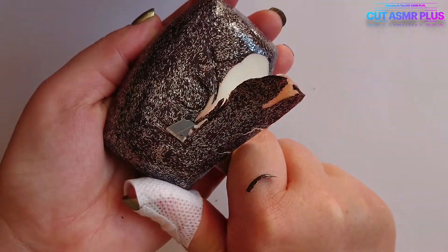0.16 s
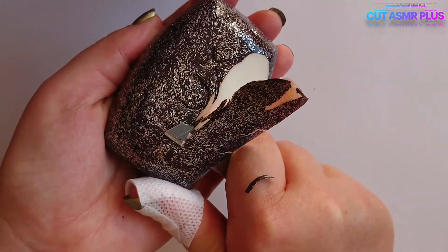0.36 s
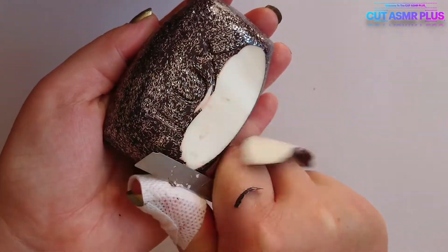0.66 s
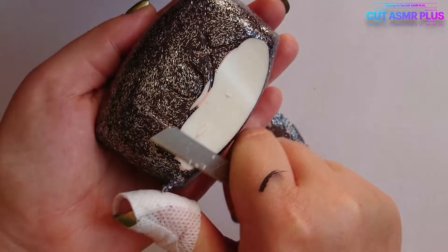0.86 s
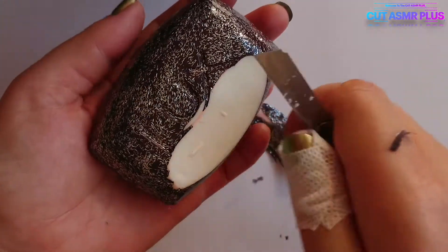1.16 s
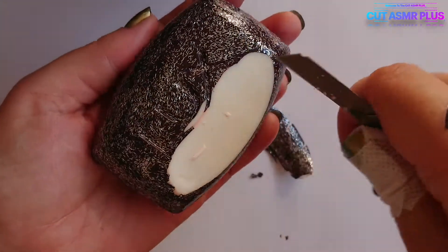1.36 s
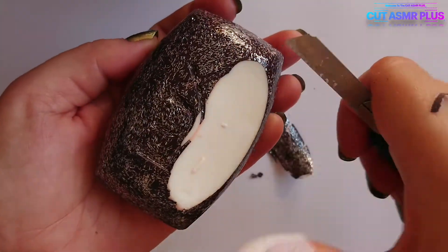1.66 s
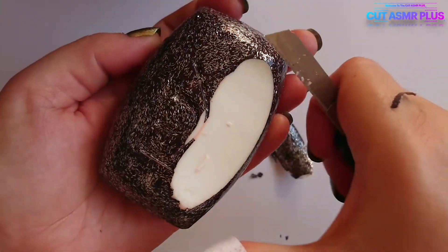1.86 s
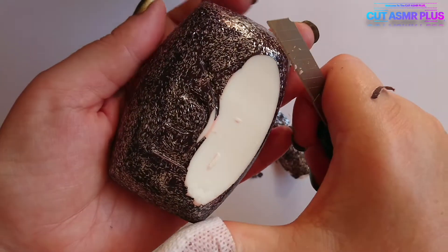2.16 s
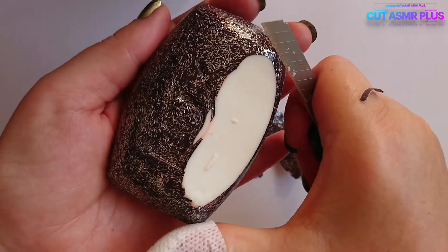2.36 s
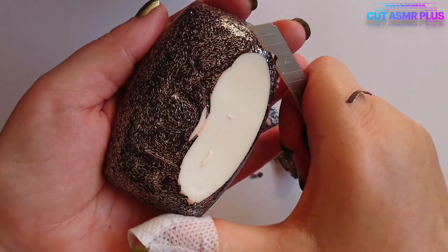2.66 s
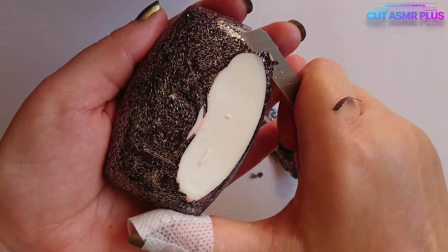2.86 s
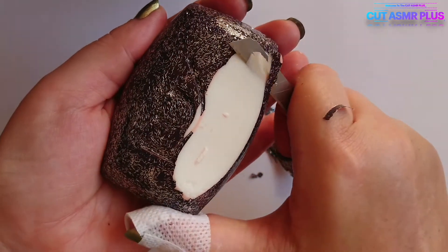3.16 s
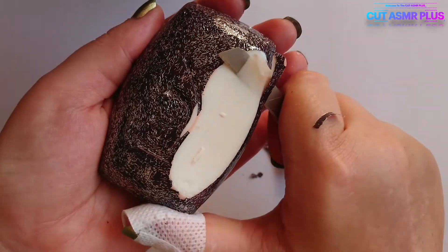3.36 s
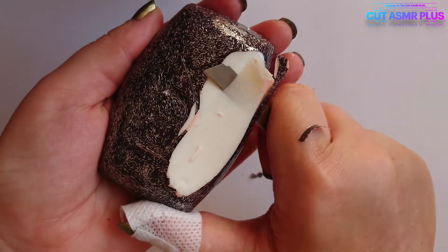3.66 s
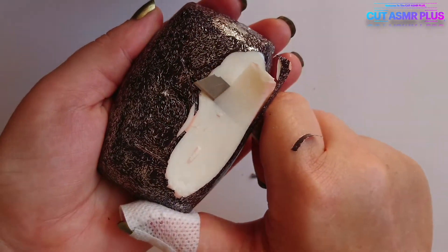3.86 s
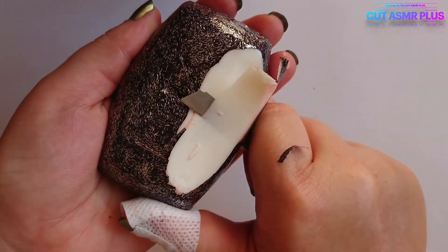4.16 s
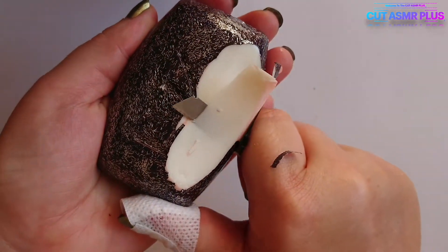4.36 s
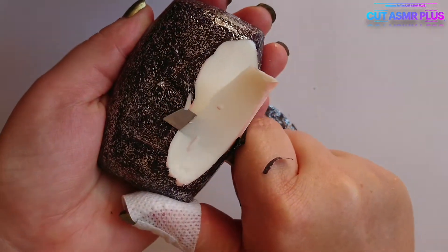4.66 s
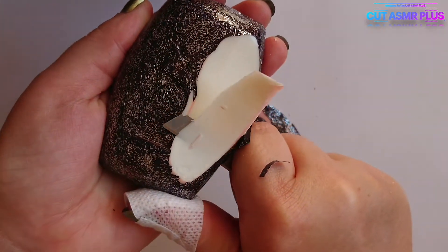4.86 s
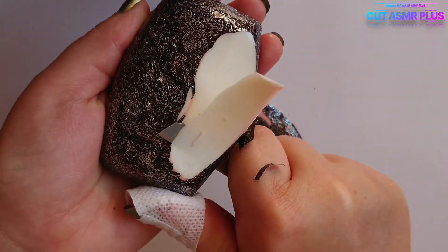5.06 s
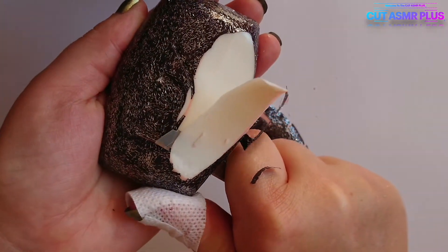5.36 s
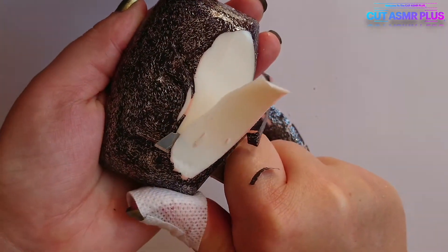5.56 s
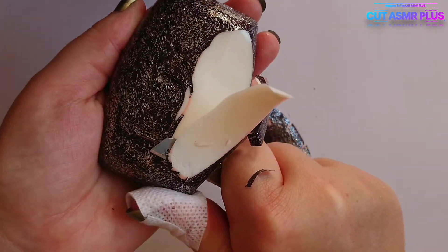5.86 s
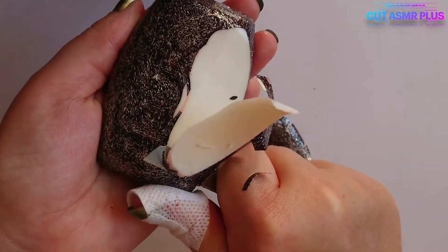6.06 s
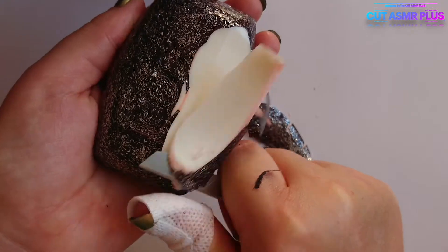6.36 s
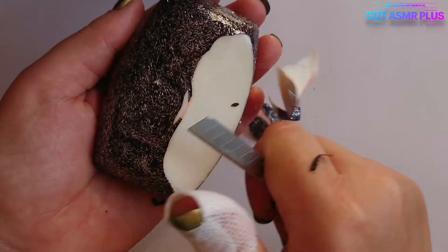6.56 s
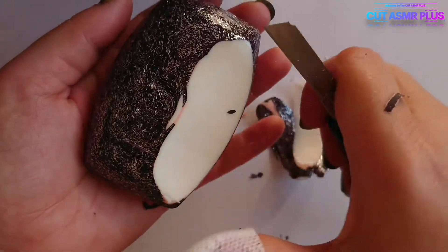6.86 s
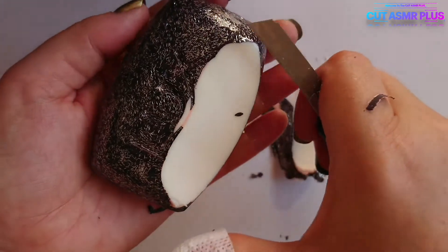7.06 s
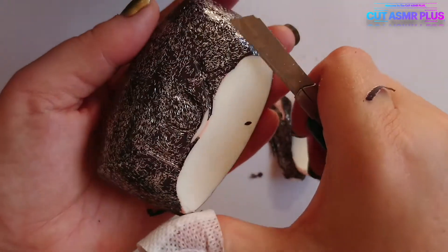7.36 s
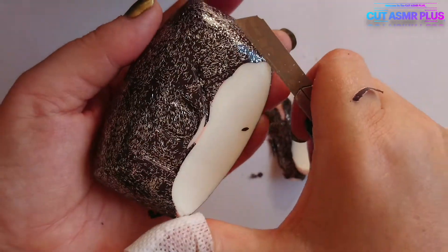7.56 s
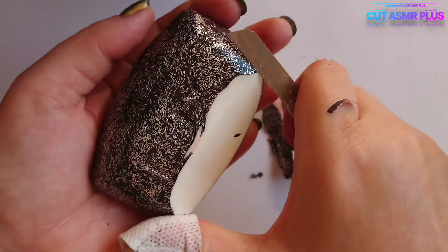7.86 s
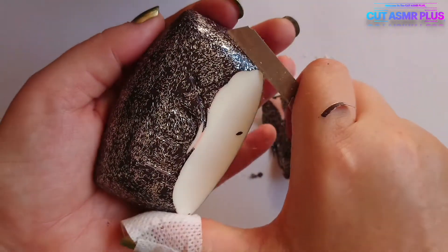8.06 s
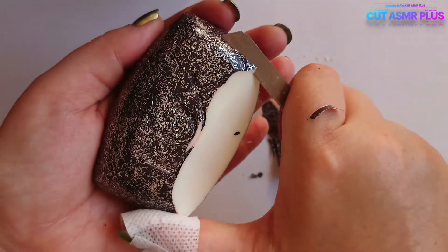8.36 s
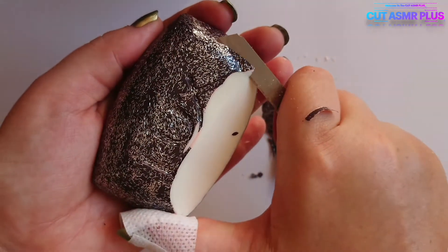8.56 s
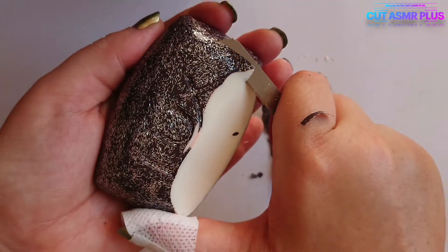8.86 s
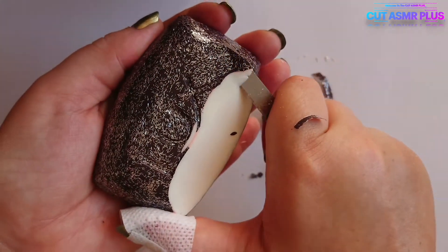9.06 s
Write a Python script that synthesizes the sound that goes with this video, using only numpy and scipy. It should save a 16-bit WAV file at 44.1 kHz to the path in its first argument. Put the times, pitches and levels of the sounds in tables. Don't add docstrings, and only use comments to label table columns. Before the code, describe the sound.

Brittle coating breaks with glassy, high snaps and a short metallic blade ring, followed by shavings clattering and rocking on a wooden tabletop. After a few blade taps, delicate irregular ticks and faint rasping thicken into crackle, thin out, then burst into crunchy cracks and another drop. The end is nearly still, with small clicks over room rumble, hiss and a faint appliance drone. Two close microphones.

```python
import sys
import numpy as np
from scipy import signal
from scipy.io import wavfile
from scipy.ndimage import uniform_filter1d

SR = 44100
rng = np.random.default_rng(int(sys.argv[2]) if len(sys.argv) > 2 else 0)


def invert_db(level):
    return 10 ** (np.asarray(level, dtype=float) / 20)


def pcm_store(signal):
    levels = np.round(np.clip(np.atleast_2d(signal), -1, 1) * 32767)
    wavfile.write(sys.argv[1], SR, levels.astype(np.int16).T)


N = 407043

# (pitch [Hz], width [Hz], level [dB])
BAR = [(1415, 980, -19.5), (2004, 560, 0), (2650, 190, -1.5)]
# (pitch [Hz], width [Hz], level [dB])
BLADE = [(2840, 1170, 4), (4080, 640, 8), (4640, 250, 8.5), (5795, 1800, 4)]
# (pitch [Hz], width [Hz], level [dB])
FLAKE = [(7500, 2400, 3), (8770, 2700, 6), (11720, 7100, 4), (12690, 1800, 7.5), (13860, 1300, 1),
         (15280, 1100, 1.5), (15970, 1200, -4.5)]


def rms_one(x):
    return x / np.sqrt(np.mean(x ** 2) + 1e-20)


def at_hz(points, hz):
    table_hz, values = np.array(points)[:, 0], np.array(points)[:, 1]
    return np.interp(np.log(hz), np.log(table_hz), values)


def sides(pan_db):
    return invert_db(np.array([pan_db / 2, -pan_db / 2]))


def resonate(x, hz, width):
    r = np.exp(-np.pi * width / SR)
    turn = 2 * np.pi * hz / SR
    return signal.lfilter([(1 - r * r) / 2, 0, (r * r - 1) / 2], [1, -2 * r * np.cos(turn), r * r], x)


def body(x, modes, strengths_db=None):
    extra_db = np.zeros(len(modes)) if strengths_db is None else strengths_db
    return sum((-1) ** k * invert_db(db + extra_db[k]) * resonate(x, hz, width)
               for k, (hz, width, db) in enumerate(modes))


def grains(shape, per_s, spread_db):
    sizes = invert_db(spread_db * np.minimum(rng.exponential(1, shape), 4))
    signs = rng.choice([-1, 1], shape)
    return rms_one(sizes * signs * (rng.random(shape) < per_s / SR))


def stroke_gain(s, db, fade_s=0.029):
    t = np.arange(N) / SR
    to_nearest_end = np.minimum(t - s[0] + fade_s, s[-1] + fade_s - t)
    return invert_db(np.interp(t, s, db)) * np.clip(to_nearest_end / fade_s, 0, 1)


def bands(x):
    edges = 20 * 2 ** np.arange(0, 10.1, .5)
    for k, (low, high) in enumerate(zip(edges, edges[1:])):
        band = signal.butter(2, [low, high], "band", fs=SR, output="sos")
        yield np.sqrt(low * high), signal.sosfilt(band, x[k % 2])


def background():
    # (pitch [Hz], level [dB per Hz])
    hiss = [(12, -56), (20, -25.5), (35, -14), (63, -1), (342, -11.5), (551, -14), (599, -10), (1050, -17),
            (1510, -15), (2120, -20), (2440, -12.5), (3830, -25), (4930, -30), (6000, -31), (8000, -24),
            (13000, -18.5), (16500, -20)]
    # (pitch [Hz], likeness [0 to 1])
    likeness = [(30, .1), (130, 0.28), (290, 0.062), (640, 0.026), (16000, .01)]
    # (pitch [Hz], width [Hz], level [dB])
    hums = [(1044, 78, -71.5), (2175, 300, -66), (3870, 400, -73.5)]
    out = 0
    for hz, (mid, side) in bands(rng.standard_normal((2, 2, N))):
        alike = np.clip(at_hz(likeness, hz), 0, 1)
        pair = np.sqrt(1 + alike) * mid + np.sqrt(1 - alike) * side * [[1], [-1]]
        out = out + invert_db(at_hz(hiss, hz)) * pair
    out = invert_db(-57) * rms_one(out)
    white = rng.standard_normal((2, N))
    for hz, width, db in hums:
        out = out + invert_db(db) * rms_one(resonate(resonate(white, hz, width), hz, width))
    return out * sides(-1.2)[:, None]


def room(x, onset_ms=0.88, treble_db=0.0):
    # (pitch [Hz], time to fall 60 dB [s])
    echo_times = [(300, 0.46), (790, 0.41), (2090, 0.44), (5510, 0.44), (14600, 0.28)]
    t = np.arange(SR // 2) / SR
    slices = bands(rng.standard_normal((2, 2, len(t))))
    tail = sum(noise * invert_db(treble_db * np.log2(hz / 2000) - 60 * t / at_hz(echo_times, hz))
               for hz, noise in slices)
    tail = tail * np.clip(t * 1000 / onset_ms - .4, 0, 1)
    tail = tail / np.sqrt(np.sum(tail ** 2, axis=1, keepdims=True))
    return signal.fftconvolve(x, tail, axes=1)[:, :N]


def knocks():
    # (time [s], peak [dB], brightness [dB per octave])
    first_drop = [(0.373, -37, 7), (0.395, -34, 12), (.47, -35, -14), (0.5889, -10, 6), (0.6, -17.5, 5.5),
                  (0.604, -28, 12), (0.611, -19, 4), (0.646, -12, 1), (0.7045, -9.5, -2), (0.7154, -11, 3),
                  (0.7414, -22, 6)]
    # (time [s], peak [dB], brightness [dB per octave])
    second_drop = [(5.951, -34.5, 7.5), (6.101, -57, 17.5), (6.2408, -30.5, 4.5), (6.4725, -5.5, -2),
                   (6.482, -19.5, 0), (6.5235, -16, 5.5), (6.532, -30.5, 11.5), (6.566, -15, -2),
                   (6.817, -28.5, -1.5)]
    # (time [s], peak [dB], brightness [dB per octave])
    taps = [(2.06, -46.5, -7), (2.186, -44, 2.5), (2.487, -40.5, 11), (7.29, -41, -7), (7.375, -34, -11),
            (7.983, -51, 14)]
    # (time [s], level [dB])
    tumble = [
        [(.615, -30), (.68, -35.5), (.75, -30), (.8, -61), (.86, -64)],
        [(6.5, -25.5), (6.58, -30), (6.68, -40), (6.76, -44.5), (6.82, -51), (6.9, -54)],
    ]
    # (pitch [Hz], level [dB], time to fall 60 dB [s])
    table_modes = [(91.1, -14.5, 0.068), (135, -15, 0.15), (213, -10.5, 0.16), (318, -7, 0.1),
                   (414.5, -8.5, 0.081), (454, -1, 0.018), (554, -10, 0.075), (670, -11.5, 0.027),
                   (692, -11, 0.083), (761, -1, 0.035), (900, 0.5, 0.019), (1093, -2, 0.019),
                   (1290, 2, 0.0053), (1492, -5.5, 0.011)]
    rows, out = np.array(first_drop + second_drop + taps), np.zeros((2, N))
    at = np.round(rows[:, 0] * SR).astype(int)
    luck = rng.standard_normal((len(rows), len(table_modes), 2))
    rocking = sum(stroke_gain(*np.transpose(rock)) for rock in tumble)
    for k, (hz, db, t60) in enumerate(table_modes):
        tilt_db = (rows[:, 2] + 2) * np.log2(max(hz, 300) / 300)
        small_knocks = rocking * invert_db(db - 31.0) * grains(N, per_s=200, spread_db=4.5)
        clicks = 1e-18 + small_knocks * np.ones((2, 1))
        luck_db = 1.8 * luck[:, k, 0] + 1.53 * luck[:, k, 1] * [[1], [-1]]
        clicks[:, at] += invert_db(rows[:, 1] - 14.0 + db + tilt_db + luck_db)
        b, a = signal.butter(2, hz / 3.9, "high", fs=SR)
        r, w = invert_db(-60 / (t60 * SR)), 2 * np.pi * hz / SR
        top, bottom = np.convolve(b, [0, np.sin(w)]), np.convolve(a, [1, -2 * r * np.cos(w), r * r])
        out += (-1) ** k * signal.lfilter(top, bottom, clicks)
    return out * sides(-3.5)[:, None]


def creak():
    # (time [s], level [dB])
    bending = [
        (6.081, -56),
        (6.13, -44),
        (6.2, -48),
        (6.26, -45),
        (6.33, -57),
        (6.43, -55),
    ]
    shudder = body(rng.standard_normal(N), [(110, 66, 1.5), (174, 73, 6.43), (217, 70, 2.9)])
    return stroke_gain(*np.transpose(bending)) * rms_one(shudder) * sides(-5.5)[:, None]


def rasp(alike=0.17):
    # (start [s], length [s], level at start [dB], level at end [dB], dull rasp above bright [dB])
    strokes = [(0, 0.18, -40.5, -72, -15), (0.38, 0.012, -29.5, -34, 5), (0.858, 0.029, -52, -55, 1.5),
               (0.942, 0.11, -44, -40.5, -4.5), (1.084, 0.33, -56, -61, 3), (2.599, 0.31, -57, -59.5, 3.5),
               (2.945, 0.67, -61.5, -58, 2), (3.694, 0.39, -62, -57.5, 1.5), (4.16, 0.93, -66.5, -67, 4),
               (5.824, 0.073, -61, -52, 5.5), (5.95, 0.041, -35.5, -94, 12), (6.088, 0.28, -64, -52.5, 2.5),
               (6.476, 0.21, -40, -46.5, 2.5), (6.725, 0.63, -53, -74, 2.5)]
    slips = grains((3, N), per_s=770, spread_db=3.5)
    push = np.sqrt(alike) * slips[0] + np.sqrt(1 - alike) * slips[1:]
    blade = body(push, BLADE)
    bright = rms_one(body(push, FLAKE) + invert_db(-2.0) * blade)
    dull = rms_one(body(push, BAR) - invert_db(-3.0) * blade)
    out = 0
    for s, length, start_db, end_db, dull_db in strokes:
        out = out + stroke_gain([s, s + length], [start_db, end_db]) * (bright + invert_db(dull_db) * dull)
    return out


def pings(width=280, lasting_width=45):
    # (time [s], pitch [Hz], peak [dB])
    tip_touches = [(.0158, 4000, -26), (.2252, 2670, -25), (.2908, 4300, -36), (.3588, 4050, -13),
                   (.3725, 4000, -22), (.3765, 4000, -18), (.3915, 4100, -19), (.3965, 4050, -12),
                   (.4005, 4000, -12), (1.7948, 4520, -28), (.786, 2500, -39), (.861, 1950, -43),
                   (2.0615, 1950, -22), (2.1876, 4450, -25), (2.4855, 2040, -18), (2.487, 2040, -13),
                   (2.488, 2040, -14), (2.487, 3880, -19), (2.7358, 5500, -29), (6.3632, 2220, -24),
                   (6.5237, 5900, -12), (6.5285, 5000, -19), (6.3415, 2350, -33), (6.352, 2300, -30),
                   (6.372, 2400, -32), (6.414, 2150, -41), (6.7925, 2300, -36), (7.377, 1750, -27),
                   (7.8552, 3698, -37)]
    # (time [s], pitch [Hz], peak [dB])
    free_rings = [(.3965, 4120, -31), (.3995, 3900, -31), (.884, 1950, -34), (.892, 2350, -35),
                  (1.7955, 4620, -38), (1.797, 4400, -39), (2.189, 4480, -41), (2.487, 2080, -33),
                  (6.3635, 2380, -38), (7.8555, 3690, -48)]
    out = np.zeros(N)
    click = 1. * (np.arange(4096) == 0)
    for rows, width_hz in ((tip_touches, width), (free_rings, lasting_width)):
        for s, hz, db in rows:
            note = resonate(click, hz, width_hz)
            out[round(s * SR):][:4096] += invert_db(db) * note / note.max()
    return out


def crack_rows():
    # (time [s], flake snap [dB], blade ring [dB])
    snaps = [(.0158, -22.5, -32), (.1506, -48, -45), (.1943, -37, -45), (.2252, -15, -27.5),
             (.2908, -38.5, -40.5), (.5762, -25, -32), (.9692, -36.5, -66), (1.0615, -37, -54),
             (5.7709, -36.5, -47.5), (5.8271, -42.5, -43.5), (5.8347, -37, -44), (5.859, -33, -60),
             (5.8764, -19, -29.5), (5.893, -32, -35.5), (5.9003, -32, -37), (5.9252, -20, -32),
             (6.1181, -41.5, -45), (6.1938, -39, -44), (6.314, -34, -42.5), (6.449, -38, -41.5),
             (6.4662, -27.5, -44.5), (6.5901, -24.5, -35), (6.6312, -42, -44), (6.645, -31.5, -38),
             (6.6517, -27.5, -51), (6.7303, -36.5, -51), (6.8078, -40.5, -51), (8.9256, -45, -58)]
    # (time [s], flake snap [dB], blade ring [dB])
    fine_snaps = [(0.04, -46, -52), (0.254, -49, -46.5), (0.5442, -40, -56.5), (0.563, -45, -54.5),
                  (0.915, -55, -45), (0.9453, -45.5, -47), (0.9515, -45, -47), (0.9954, -47.5, -50),
                  (0.999, -38, -51), (1.3282, -55, -53.5), (1.7955, -31, -52.5), (1.8174, -55, -47),
                  (1.8354, -53, -57), (1.847, -56, -52), (5.8303, -43, -48), (5.838, -44, -50),
                  (5.866, -53, -59), (5.9092, -42, -55.5), (6.1623, -41.5, -51), (6.2261, -46, -55),
                  (6.2399, -35.5, -38.5), (6.3049, -41, -49), (6.3515, -38, -44.5), (6.36, -52.5, -38.5),
                  (6.5279, -22.5, -20.5), (6.6106, -46, -53), (6.631, -36, -45), (6.734, -38.5, -44),
                  (6.764, -51, -45), (6.814, -53.5, -46), (6.8623, -57, -56)]
    # (time [s], flake snap [dB], blade
    # ring [dB], bar ring [dB])
    breaks = [(.3588, -21, -30.5, -46.5), (.3636, -28.5, -27, -43), (.3726, -30.5, -20.5, -33),
              (.3762, -22.5, -21.5, -39), (.3833, -33.5, -25, -34), (.3927, -17, -19, -33.5),
              (.3961, -8.5, -15, -21.5), (.3975, -33, -17, -29.5), (.4022, -19.5, -22.5, -23),
              (.5888, -2.5, -13.5, -8), (.5945, -19, -16.5, -35.5), (.6022, -30, -26, -45),
              (.6462, -33, -30, -45), (.7039, -26.5, -34.5, -48), (.7148, -22.5, -25, -18),
              (.7412, -34.5, -38, -28), (5.9344, -19, -45, -40), (5.9427, -18, -33, -36),
              (5.9471, -9.5, -20.5, -45), (5.9524, -9.5, -28, -46.5), (5.9537, -6.5, -27.5, -43.5),
              (5.9596, -17.5, -27, -31), (5.9686, -8.5, -27, -41), (6.4736, -25, -27, -24),
              (6.5237, -24, -15, -21.5), (6.5343, -22.5, -18, -18), (6.566, -37, -45, -26.5),
              (0.3705, -34.5, -34.5, -39), (0.3905, -26.5, -19.5, -26), (0.3999, -17.5, -22, -28),
                 (0.6425, -33.5, -33, -42), (0.6558, -34, -32, -48), (0.6623, -39.5, -32, -48),
                 (0.6684, -39, -39, -41), (0.675, -43, -36, -41), (0.8892, -41, -41, -31),
                 (5.9266, -26, -30.5, -46), (5.937, -19, -31, -35), (5.94, -22, -24, -46)]
    # (time [s], flake snap [dB], blade ring [dB], bar ring [dB])
    touches = [(.8807, -43, -36.5, -25), (.8858, -41, -28, -28), (.8949, -44.5, -34.5, -34),
               (.8974, -34.5, -35, -30), (1.1325, -41, -38.5, -31.5), (1.1917, -56, -56, -42),
               (1.2256, -51.5, -40.5, -35.5), (1.7953, -35, -35, -31.5), (2.0606, -46, -35, -27),
               (2.1874, -45, -29, -21.5), (2.4864, -18.5, -19, -19), (2.5363, -31.5, -40.5, -47),
               (2.55, -25, -30.5, -47), (6.1033, -35, -25, -22), (6.241, -32.5, -32, -30),
               (6.3434, -30.5, -41.5, -48), (6.3513, -33.5, -38, -38), (6.3632, -48, -36.5, -27.5),
               (6.3721, -48.5, -41.5, -33), (6.7923, -48.5, -45, -46), (7.367, -48, -47, -36.5),
               (7.3761, -32, -31.5, -22.5), (7.8552, -39.5, -35.5, -39), (7.9795, -25.5, -27, -43),
               (7.9832, -18, -21.5, -26.5), (7.9861, -18, -19.5, -44), (7.989, -27, -19.5, -51)]
    # (time [s], flake snap
    # [dB], blade ring [dB])
    creep = [(2.6592, -30.5, -42), (2.7358, -30.5, -32.5), (2.7769, -48, -61), (2.8566, -46, -52),
             (2.8891, -59.5, -56.5), (2.9202, -38, -39.5), (3.0509, -51, -57.5), (3.0622, -39, -42),
             (3.1433, -45, -57), (3.1943, -44, -47.5), (3.2735, -49, -53), (3.3213, -46, -58),
             (3.3786, -47, -49.5), (3.3988, -48, -50.5), (3.4743, -48.5, -51.5), (3.4964, -44, -46.5),
             (3.5664, -46.5, -61), (3.6124, -47, -58.5), (3.7152, -56, -56), (5.3053, -37.5, -47.5),
             (5.3741, -40.5, -43), (5.4093, -42.5, -51.5), (5.5119, -34.5, -53.5), (5.5364, -32.5, -48),
             (5.578, -30.5, -30.5), (3.8829, -47, -48), (4.3198, -42.5, -58), (4.5457, -40, -53),
             (7.011, -49, -48.5), (7.041, -58, -54.5),
             (2.684, -51, -49.5), (2.6983, -52, -51), (2.7305, -53, -48), (2.744, -55, -54),
                  (2.7914, -47, -47), (2.8808, -54, -57), (3.083, -53, -49.5), (3.092, -54, -54),
                  (3.1044, -52, -57), (3.12, -59, -59), (3.1576, -52, -59.5), (3.161, -70, -55),
                  (3.1744, -58, -54.5), (3.225, -50, -49), (3.2532, -50.5, -59), (3.2802, -53, -60),
                  (3.3034, -48, -61), (3.3061, -55, -60.5), (3.3122, -53, -60), (3.481, -47, -56.5),
                  (3.503, -42, -55.5), (3.5998, -54, -57.5), (5.0125, -55, -59), (5.0208, -60.5, -52),
                  (5.308, -51, -57.5), (5.784, -45, -51.5), (6.9067, -59, -61.5), (7.0398, -58, -54),
                  (7.442, -55, -53.5), (7.8956, -58, -48), (7.9476, -54, -53), (7.961, -55, -52),
                  (9.1086, -64, -74)]
    # (time
    # [s], flake snap [dB], blade ring [dB])
    glide = [(3.6743, -30.5, -43.5), (3.783, -41.5, -57.5), (3.8192, -32.5, -53), (3.822, -31.5, -47),
             (3.9161, -33, -45), (3.9349, -38, -44), (3.9641, -40, -62.5), (3.977, -39, -52),
             (4.0243, -42.5, -62), (4.033, -40.5, -50), (4.0411, -34.5, -60), (4.0753, -34, -57),
             (4.1326, -36, -53), (4.2489, -44.5, -45), (4.2745, -35, -52), (4.3593, -35, -51),
             (4.372, -40, -57), (4.3929, -35, -50), (4.4483, -27.5, -34), (4.4529, -32.5, -48),
             (4.4769, -37, -47), (4.4939, -36, -53), (4.5507, -32.5, -41), (4.6102, -41, -55),
             (4.6349, -34.5, -38.5), (4.6992, -32, -44.5), (4.7083, -40.5, -43.5), (4.8014, -35, -35),
             (4.8564, -32, -44), (4.873, -30, -28),
             (3.7154, -53, -56), (3.7375, -57, -58), (3.757, -55, -59), (3.7685, -51, -64),
                  (3.8042, -60, -61), (3.9001, -52, -61), (3.9617, -52, -62), (3.9868, -57, -69),
                  (4.0035, -60.5, -62), (4.0103, -54, -66), (4.058, -53, -55), (4.2315, -54, -70),
                  (4.3399, -55, -64), (4.3955, -41, -58), (4.467, -44, -57), (4.4805, -38, -38),
                  (4.5876, -52, -55), (4.7506, -49, -48), (4.834, -50.5, -60), (4.8823, -47, -47.5)]

    def with_bar(rows, bar_db):
        return [(s, flake, blade, blade + bar_db) for s, flake, blade in rows]

    crisp_ms = .25
    kinds = [(with_bar(snaps + fine_snaps, -21), (crisp_ms, 4.0, 0, 7.6, -2, -3.5)),
             (breaks, (1.58, 1.5, 0.18, 1, -3, -0.5)),
             (touches, (3, 1.5, 0.45, -2, -3.5, .5)),
             (with_bar(creep, -25), (crisp_ms, 1.5, 0.31, 0, -0.5, -3)),
             (with_bar(glide, -25), (crisp_ms, 2.0, 0.4, 12, 2.5, -5))]
    out = []
    for rows, (tear_ms, pan_db, lean, tilt_db, boost_db, walls_db) in kinds:
        for s, flake, blade, bar in rows:
            left_db = min(pan_db + lean * (flake - blade), 9.0)
            out.append((s, flake + boost_db, blade, bar, left_db, tear_ms, tilt_db, walls_db))
    return out


def cracks(alike=0.79, lag_per_db=2.5, colour_db=3.0, lead=2.44, brighten=0.11, swell=2.5):
    lowest_hz = (2602, 1450, 700)
    columns = np.transpose(crack_rows())[:, :, None]
    s, flake_db, blade_db, bar_db, pan_db, tear_ms, tilt_db, walls_db = columns
    t, tear_ms = np.arange(768) / SR, np.clip(tear_ms, .2, 5)

    slips = grains((len(s), 3, len(t)), per_s=14000, spread_db=5.0)
    age = t * 1000 / tear_ms
    run = np.exp(-age) * (1 - np.exp(-swell * age))
    snap = np.argmax(run, axis=1)
    push = run[:, None] * (np.sqrt(alike) * slips[:, :1] + np.sqrt(1 - alike) * slips[:, 1:])
    push[np.arange(len(s)), :, snap] += lead / tear_ms
    bounce = round(1.4 * SR / 1000)
    push = push + invert_db(-15.5) * np.pad(push, ((0, 0), (0, 0), (bounce, 0)))[:, :, :len(t)]

    colour = colour_db * rng.standard_normal((len(s), 3, len(FLAKE)))
    slope_db = tilt_db + brighten * np.clip(flake_db - blade_db, -20, 12)
    colour[:, 0] += slope_db * np.log2(np.array(FLAKE)[:, 0] / 10000)
    levels_db = (flake_db - .3, blade_db - 0.5, bar_db - 5.0)
    pans_db = (pan_db, 0.44 * pan_db - 9.5, 0.26 * pan_db - 1.5)
    close, plain = 0, 0
    for k, (modes, sign) in enumerate(zip((FLAKE, BLADE, BAR), (-1, -1, 1))):
        ring = body(push, modes, colour[:, k].T[:, :, None, None]) * np.moveaxis(sides(pans_db[k]), 0, 1)
        ring = signal.lfilter(*signal.butter(2, lowest_hz[k], "high", fs=SR), ring)
        power = uniform_filter1d(np.mean(ring ** 2, axis=1), size=128, mode="constant")
        loudest = np.sqrt(power.max(axis=1))
        ring = ring * (sign * invert_db(levels_db[k]) / loudest[:, None])[:, None]
        close = close + ring
        strength = np.sqrt(np.mean(ring ** 2, axis=(1, 2)))[:, None]
        plain = plain + sign * strength * rms_one(body(1. * (t == 0), modes))

    near, far = np.zeros((2, N + 2048)), np.zeros(N + 2048)
    starts = np.round(s[:, 0] * SR).astype(int) - snap
    lags = np.round(np.clip(lag_per_db * pan_db[:, 0], -12, 12)).astype(int)
    for at, lag, pair, outward in zip(starts, lags, close, plain * invert_db(walls_db)):
        near[0, at - min(lag, 0):][:len(t)] += pair[0]
        near[1, at + max(lag, 0):][:len(t)] += pair[1]
        far[at:at + len(t)] += outward
    return near[:, :N], far[:N]


def scene():
    snaps, far_snaps = cracks()
    drops, drag, notes = knocks(), rasp() + creak(), pings()
    echoes = room(invert_db(-9.5) * far_snaps + invert_db(-6.0) * drops + invert_db(-8.0) * drag + invert_db(-11.0) * notes)
    soft_top = signal.cheby2(16, 45, 16000, fs=SR, output="sos")
    return snaps + drops + notes + signal.sosfilt(soft_top, drag + echoes + background())


def band_limit(x):
    return signal.sosfilt(signal.butter(12, 16800, fs=SR, output="sos"), x)


def record(dry):
    top_cut = signal.cheby2(14, 45, 16900, fs=SR, output="sos")
    mix = signal.sosfiltfilt(top_cut, np.clip(dry, -1, 1))
    return band_limit(mix)


dry = scene()
out = record(dry)
pcm_store(out)
```